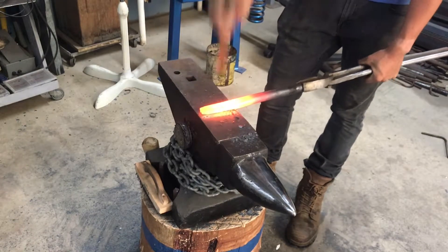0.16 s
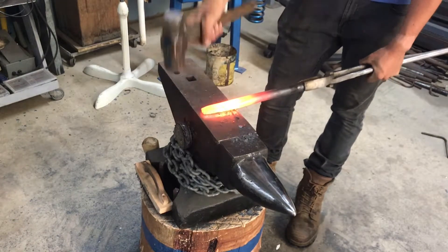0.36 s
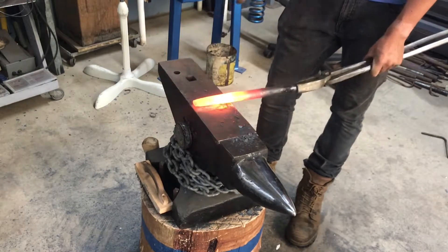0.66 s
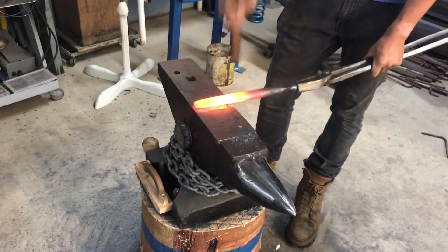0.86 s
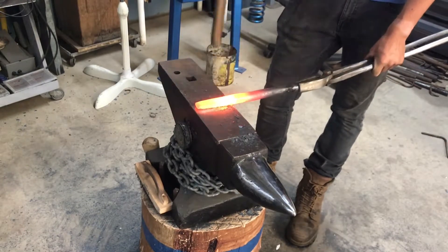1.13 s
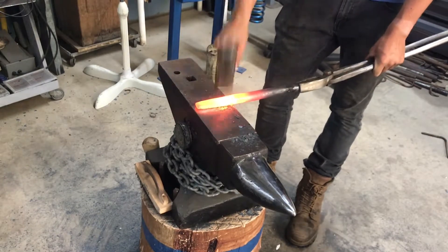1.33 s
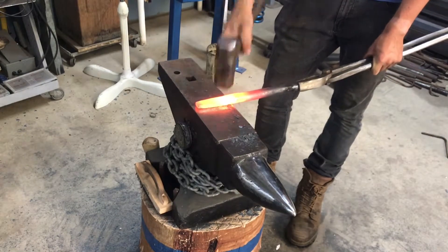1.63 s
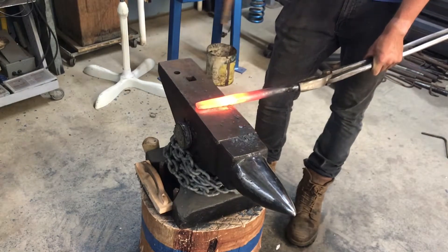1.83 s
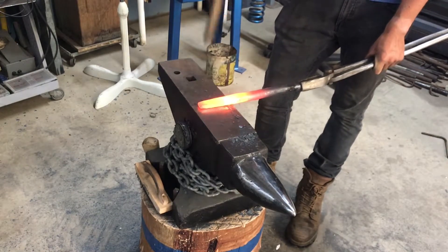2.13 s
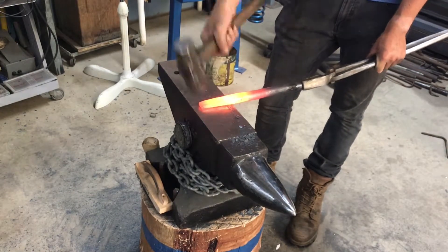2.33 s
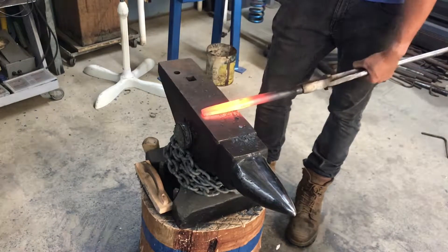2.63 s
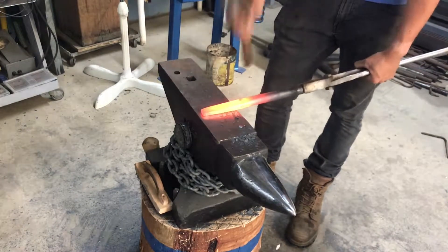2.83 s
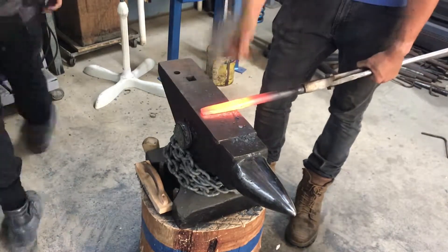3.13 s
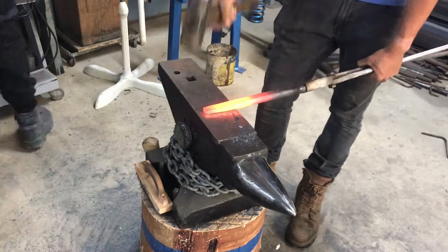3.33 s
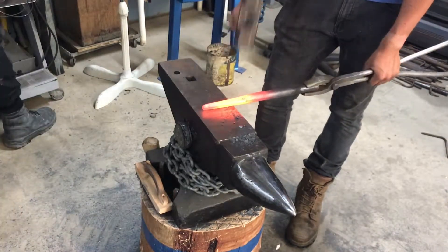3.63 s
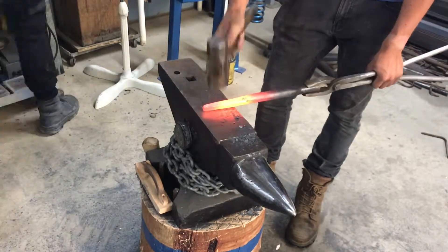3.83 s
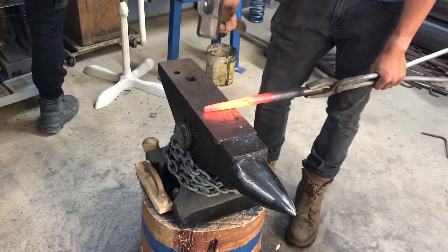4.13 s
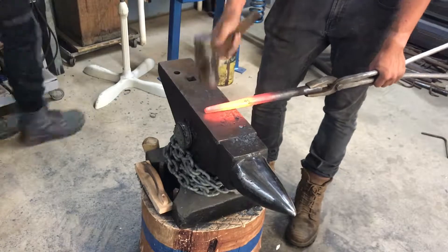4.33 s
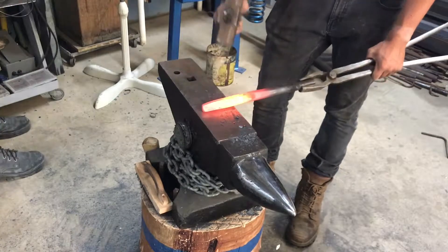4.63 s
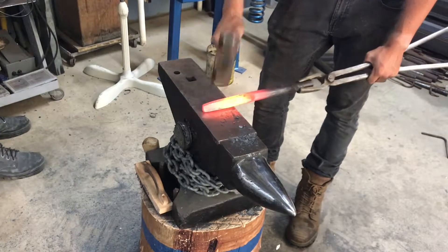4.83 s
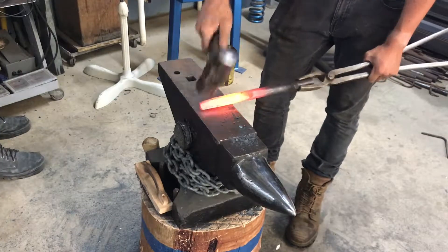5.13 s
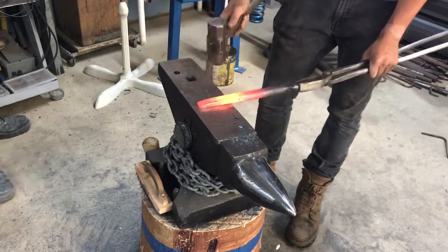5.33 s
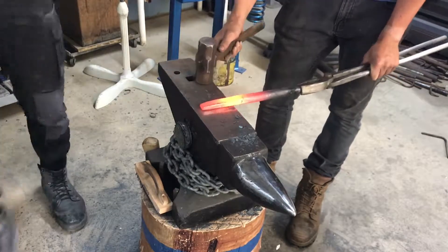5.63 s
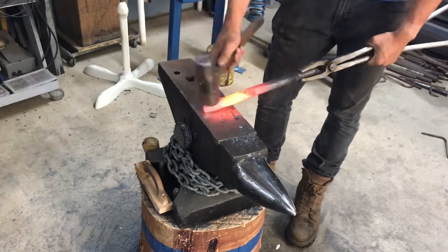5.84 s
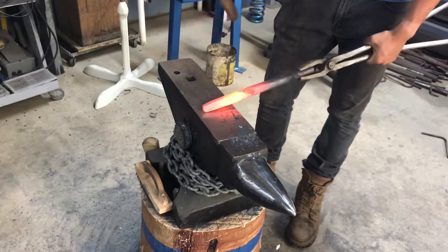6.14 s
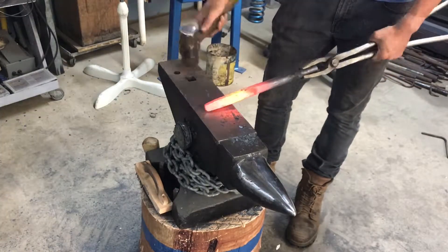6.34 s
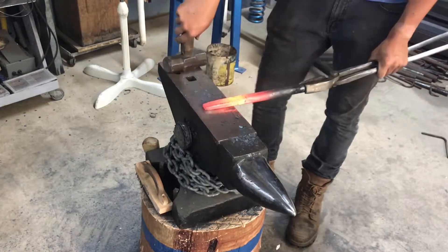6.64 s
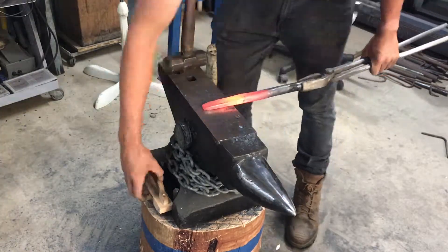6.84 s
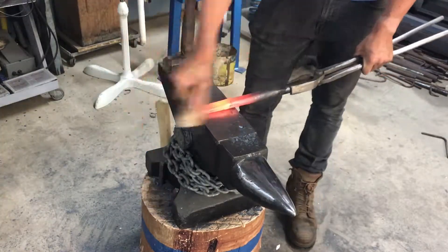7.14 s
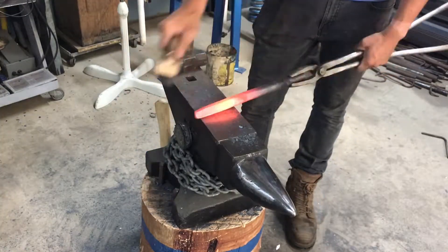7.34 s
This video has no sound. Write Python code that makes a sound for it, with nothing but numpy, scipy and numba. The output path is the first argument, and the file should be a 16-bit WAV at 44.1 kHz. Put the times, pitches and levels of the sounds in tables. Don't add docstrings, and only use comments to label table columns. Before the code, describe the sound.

A gas forge roars steadily throughout, a mid-heavy turbulent rush with flutter and soft hiss, heard from near the anvil in a small, dry workshop. Three hard hammer blows on hot steel land from 0.1 to 0.4 seconds, about seven per second. After a gap, a long run of twelve goes from 0.8 to 2.4, then five more from 2.8 to 3.4. Each is a sharp crack with short, rattly metal ringing and a wooden thump, and the forge ducks beneath it. From 3.7 to 5.3 come lighter, drier, uneven taps, with a faint tap at 5.5. Around 5.6, 6.0 and 6.4 the hammer drops and bounces in quick, shrinking clinks, with single taps at 5.9 and 6.3, and settles at 6.6. The roar continues alone until a short, scratchy wire-brush swipe at 7.1, with a faint trailing scrape.

```python
import sys
import numpy as np
from scipy import signal
from scipy.fft import rfft, irfft
from scipy.io import wavfile
from scipy.ndimage import uniform_filter1d
from numba import njit

SR = 44100
rng = np.random.default_rng(int(sys.argv[2]) if len(sys.argv) > 2 else 0)


def natural_amplitude(level_db):
    exponent = np.asarray(level_db, float) / 20
    return 10 ** exponent


def generate_wav(signal):
    frames = np.transpose(np.atleast_2d(signal))
    scaled = np.clip(frames, -1, 1) * 32767
    pcm = np.round(scaled).astype(np.int16)
    wavfile.write(sys.argv[1], SR, pcm)


N = 329868

# frequency_hz, level_db (per Hz)
FLAME_SPECTRUM = [(60, -62), (125, -72), (170, -36), (260, -19.5), (450, -19.5), (800, -15), (1300, -14),
                  (1600, -27.5), (2500, -37.5), (3000, -27), (5000, -33), (9000, -34), (11000, -48),
                  (16000, -45)]
# pitch_hz, width_hz, level_db (per Hz)
CHAMBER_RESONANCES = [(570, 184, -8), (786.5, 84, -8), (928, 44, -4.5), (1070, 120, 1), (1190, 80, -1),
                      (1390, 40, -12), (2080, 290, -31), (3540, 430, -21.5), (4100, 710, -28),
                      (3480, 70, -21), (7540, 350, -22.5), (8610, 400, -24.5), (10200, 600, -34.5),
                      (12260, 740, -39.5)]
# start_s, force_db, steel_ring_db
FULL_SWINGS = [(0.1026, -18.5, -22), (0.2479, -17.5, -21.5), (0.3943, -18.5, -25), (0.8145, -20, -23),
               (0.9499, -18.5, -22), (1.0907, -20, -23.5), (1.2321, -18.5, -21), (1.4036, -23.5, -25),
               (1.5463, -20.5, -19.5), (1.682, -20, -22.5), (1.8203, -19.5, -20.5), (1.956, -20.5, -20.5),
               (2.092, -19.5, -22), (2.2321, -20, -21), (2.378, -18, -25), (2.7689, -20.5, -22),
               (2.9166, -20.5, -22), (3.0631, -19, -22.5), (3.2097, -20.5, -20.5), (3.3563, -21, -21.5)]
# start_s, force_db, steel_ring_db
LIGHT_TAPS = [(3.6564, -31, -38), (3.7833, -31, -40), (3.8845, -26.5, -31), (3.9924, -24.5, -31),
              (4.124, -23.5, -33), (4.2553, -26, -30), (4.383, -23.5, -39), (4.6317, -33.5, -36),
              (4.7363, -27.5, -36), (4.8302, -29.5, -33), (4.9134, -28.5, -33.5), (4.997, -31.5, -36),
              (5.0837, -25.5, -39), (5.1712, -25.5, -46), (5.267, -36.5, -38), (5.5056, -41, -44),
              (5.903, -23.5, -31), (6.2859, -24, -29.5)]
# start_s, force_db, steel_ring_db, first_flight_s
HEAD_DROPS = [
    (5.5743, -31, -31, 0.032),
    (6.0022, -33.5, -22, 0.034),
    (6.4214, -40, -20.5, .0285),
    (6.633, -45, -17.5, 0),
]
# force_db, ring_db
LANDING_CHANGES = [
    (-0.5, -1),
    (-4.5, 2.5),
    (-10, -6),
]
# frequency_hz, level_db
CRACK_SPECTRUM = [(1000, -7), (2000, -3.5), (3500, 0), (6000, 1.5), (9000, -6), (13000, 2.5), (16000, -10),
                  (20000, 9.5)]
# frequency_hz, level_db
RATTLE_SPECTRUM = [(1000, 11), (2000, 1.5), (3000, -1), (4500, 4), (6000, 5.5), (8500, 11.5), (12000, -4),
                   (14000, 5), (15400, 8), (20000, -52)]
# pitch_hz, level_db, t60_s
STUMP_MODES = [(270, -.7, 0.019), (382.3, -1.5, 0.023), (520, -7, 0.025), (915, 4, .012),
               (1260, -7.5, 0.0087), (760, -9, .016)]
# pitch_hz, level_db, t60_s
BAR_MODES = [(1620, 2.5, 0.015), (1996, -2, 0.011), (2255, -1, 0.026), (2430, -9, 0.032),
             (2643, -1, 0.0091)]
# pitch_hz, level_db, t60_s
ANVIL_MODES = [(5965, -8, .03), (6920, -7, .03), (7110, -6, .04), (7195, 3, .055), (7985, -2.5, .03),
               (8580, -8, .03), (11790, -12, .04), (11870, -6.5, .055), (15290, -10, .035)]
# pitch_hz, level_db, t60_s
HEAD_MODES = [(1900, -8, .012), (2260, -7, .018), (2420, -14, .02), (9420, -6, .045), (9515, 0, .065),
              (10070, -13, .03), (15290, -17, .03)]
# start_s, level_db, fade_s
BRUSH_SWIPES = [
    (4.449, -45, .02),
    (7.089, -31.5, 0.026),
    (7.14, -46, 0.055),
    (7.3, -52, .1),
]
# frequency_hz, level_db
BRISTLE_SPECTRUM = [(1500, -15), (3000, -9), (6000, -2), (10000, 0), (15000, -14), (20000, -10)]


def shape(x, gain):
    n = x.shape[-1]
    hz = np.maximum(np.arange(n // 2 + 1) * SR / n, 1)
    return irfft(rfft(x) * gain(hz), n)


def colour(points):
    hz, db = np.transpose(points)
    return lambda f: natural_amplitude(np.interp(np.log(f), np.log(hz), db))


def unit(x):
    return x / np.sqrt(np.mean(x ** 2, axis=-1, keepdims=True))


def add(out, x, s):
    start = int(s * SR)
    out[start:start + len(x)] += x


def walk(rate_hz):
    hold = int(SR / rate_hz)
    steps = np.repeat(rng.standard_normal(N // hold + 1), hold)
    return 1.3 * uniform_filter1d(uniform_filter1d(steps, hold), hold)[:N]


def ripple(f):
    depth_db, spacing_hz, full_from_hz = 1.5, 45, 1500
    bumps = rng.standard_normal(1024)
    at_f = np.interp(f / spacing_hz, np.arange(len(bumps)), bumps)
    return natural_amplitude(depth_db * at_f * np.clip(f / full_from_hz, 0, 1) ** 4)


def forge():
    roar = shape(rng.standard_normal(N), colour(FLAME_SPECTRUM)) * natural_amplitude(1.4 * walk(6.6))
    for hz, width, db in CHAMBER_RESONANCES:
        band = shape(rng.standard_normal(N), lambda f: 1 / (1 + ((f - hz) / width * 1.9) ** 2))
        swell_db, flicker_db = 1.35 * walk(3.01), 0.93 * walk(13)
        roar += natural_amplitude(db + swell_db + flicker_db) * band
    return unit(shape(roar, ripple)) * natural_amplitude(-27.0)


def ring(modes, t, scatter_db, loose):
    lag_cycles, swell_cycles = .45, 1.3
    hz, db, t60 = np.transpose(modes)[:, :, None]
    size_chance, phase_chance = rng.standard_normal((2, len(modes), 1))
    age = np.maximum(t - lag_cycles / hz, 0)
    swell = 1 - np.exp(-age * hz / swell_cycles)
    side = (-1.) ** np.arange(len(modes))[:, None]
    level = side * natural_amplitude(db + scatter_db * size_chance) * swell * natural_amplitude(-60 * age / t60)
    return np.sum(level * np.sin(2 * np.pi * hz * age + loose * phase_chance), axis=0)


def chatter(x, t, rough, fade):
    knocks = rng.standard_normal(len(t)) * np.exp(-t / fade)
    return x + rough * signal.fftconvolve(x, knocks / np.linalg.norm(knocks))[:len(t)]


def strike(out, s, force_db, ring_db, crack_db, crack_slope, crush_s, lead_s, bar_db, anvil_db, head_db):
    t = np.arange(5120) / SR
    grit = unit(shape(rng.standard_normal(len(t)), colour(CRACK_SPECTRUM)))
    rattle = unit(shape(rng.standard_normal(len(t)), colour(RATTLE_SPECTRUM)))
    snap_and_crush = np.exp(-t / .001) + 0.59 * np.exp(-t / crush_s)
    add(out, natural_amplitude(crack_db + crack_slope * force_db + 6.5) * grit * snap_and_crush, s - lead_s)

    anvil_level_db = ring_db + anvil_db
    clang = natural_amplitude(anvil_level_db + 4) * (np.exp(-t / .011) + .12 * np.exp(-t / .03)) * rattle
    anvil = chatter(ring(ANVIL_MODES, t, scatter_db=3, loose=3), t, rough=2.2, fade=.012)
    stump = ring(STUMP_MODES, t, scatter_db=.5, loose=.05)
    bar = chatter(ring(BAR_MODES, t, scatter_db=.8, loose=.1), t, rough=.45, fade=.007)
    head = chatter(ring(HEAD_MODES, t, scatter_db=1.5, loose=3), t, rough=.6, fade=.018)
    blow = natural_amplitude(-1.5) * (clang + natural_amplitude(anvil_level_db - 4) * anvil)
    blow += natural_amplitude(force_db + 16) * stump
    blow += natural_amplitude(force_db + bar_db + 7) * bar
    blow += natural_amplitude(ring_db + head_db - 1) * head
    add(out, blow, s)


def landings():
    restitution = .47
    contacts = []
    for s, force_db, ring_db, flight in HEAD_DROPS:
        for k, (force_change_db, ring_change_db) in enumerate(LANDING_CHANGES):
            if flight or k == 0:
                delay = flight * (1 - restitution ** k) / (1 - restitution)
                contacts.append((s + delay, force_db + force_change_db, ring_db + ring_change_db))
    return contacts


def hammer():
    out = np.zeros(N + SR)
    for s, force_db, ring_db in FULL_SWINGS:
        strike(out, s, force_db, ring_db, crack_db=-1.5, crack_slope=1.01, crush_s=.0045, lead_s=.0005,
               bar_db=-4, anvil_db=0.5, head_db=3)
    for s, force_db, ring_db in LIGHT_TAPS:
        strike(out, s, force_db, ring_db, crack_db=-15, crack_slope=.2, crush_s=.0018, lead_s=-.0007,
               bar_db=-1.5, anvil_db=-1.5, head_db=-13)
    for s, force_db, ring_db in landings():
        strike(out, s, force_db, ring_db, crack_db=4, crack_slope=0.86, crush_s=.0016, lead_s=-.001,
               bar_db=1.5, anvil_db=-22, head_db=1.5)
    return out[:N]


def brush():
    t = np.arange(N) / SR
    ticks = rng.standard_normal(N) * natural_amplitude(1.9 * rng.exponential(size=N))
    stroke = np.zeros(N)
    for s, db, fade in BRUSH_SWIPES:
        stroke += natural_amplitude(db) * (t > s) * np.exp(-np.abs(t - s) / fade)
    return stroke * unit(shape(ticks, colour(BRISTLE_SPECTRUM)))


def shop(x):
    t60_s, tail_db, damp_hz, thin_hz = 0.085, -8, 11300, 600
    wall_s, wall_db, wall_hz = .0068, -11, 1200
    t = np.arange(SR // 3) / SR
    tail = rng.standard_normal(len(t)) * natural_amplitude(-60 * t / t60_s) * (t > .003)
    tail = shape(tail, lambda f: 1 / np.sqrt((1 + (f / damp_hz) ** 2) * (1 + (thin_hz / f) ** 4)))
    tail *= natural_amplitude(tail_db) / np.linalg.norm(tail)
    wall = 1. * (np.arange(len(t)) == int(wall_s * SR))
    tail -= natural_amplitude(wall_db) * shape(wall, lambda f: 1 / (1 + (f / wall_hz) ** 2))
    return x + signal.fftconvolve(x, tail)[:N]


def scene():
    return (shop(hammer() + brush()) + forge())[None]


@njit
def follow(x, attack, release):
    out, e = np.empty(len(x)), 0.
    for i in range(len(x)):
        e += (abs(x[i]) - e) * (attack if abs(x[i]) > e else release)
        out[i] = e
    return out


def low_pass(x):
    return signal.sosfilt(signal.butter(12, 16980, fs=SR, output="sos"), x)


def record(dry):
    x = signal.sosfilt(signal.butter(4, 170, "high", fs=SR, output="sos"), dry[0])
    loud = follow(x, 1 / (0.0034 * SR), 1 / (0.052 * SR))
    x = x * np.minimum(1, natural_amplitude(-22.0) / (loud + 1e-9)) ** 0.4
    ceiling, top_hz = .44, 15750
    x = ceiling * np.tanh(x / ceiling)
    x = x + 0.86 * x ** 4
    body = shape(x, lambda f: f < top_hz)
    top = shape(x, lambda f: (f > top_hz) & (f < 16900))
    gate = uniform_filter1d(1. * (follow(top, .05, .02) > natural_amplitude(-43)), 128)
    mix = body + .3 * top * gate
    return low_pass(mix[None])


dry = scene()
out = record(dry)
generate_wav(out)
```